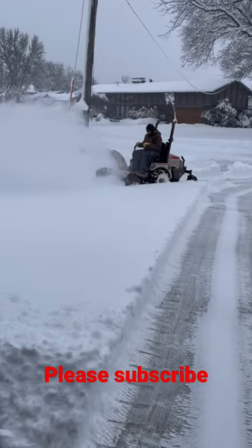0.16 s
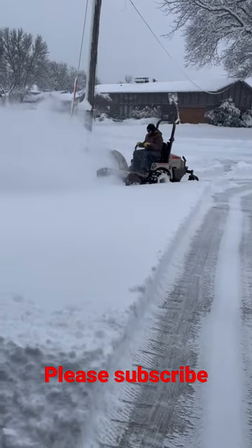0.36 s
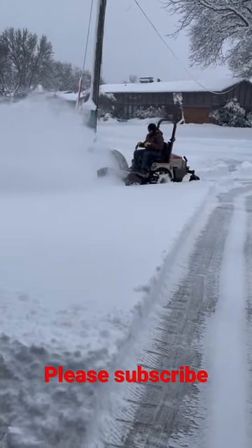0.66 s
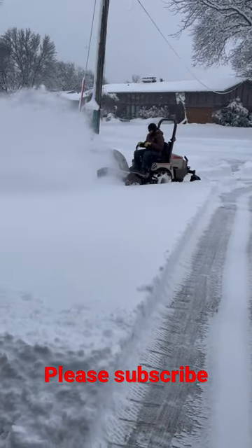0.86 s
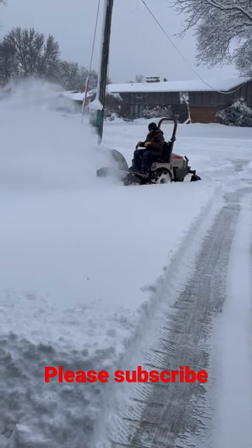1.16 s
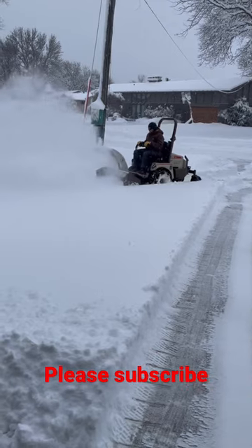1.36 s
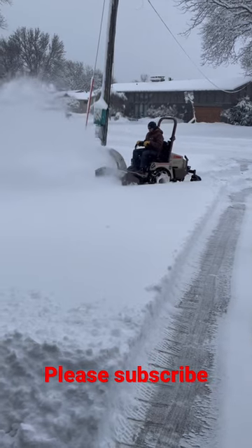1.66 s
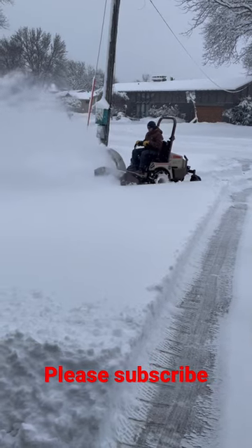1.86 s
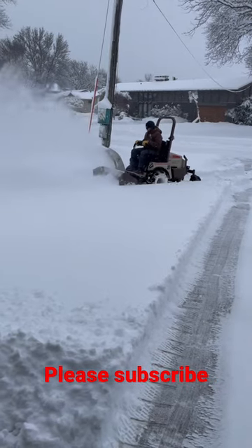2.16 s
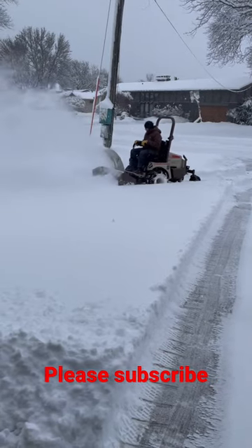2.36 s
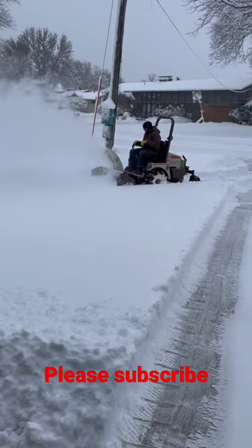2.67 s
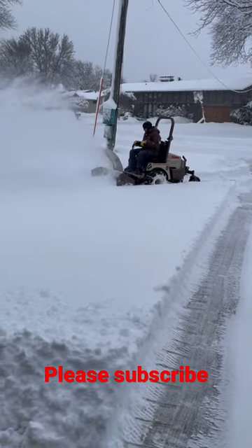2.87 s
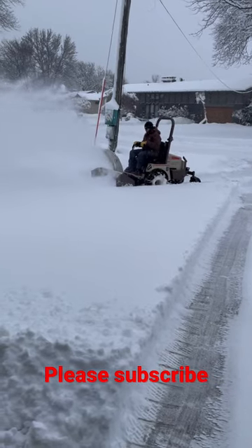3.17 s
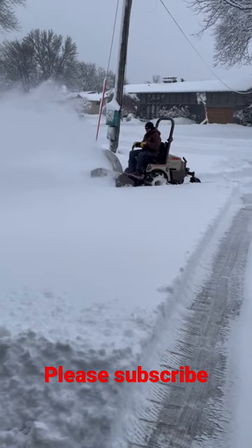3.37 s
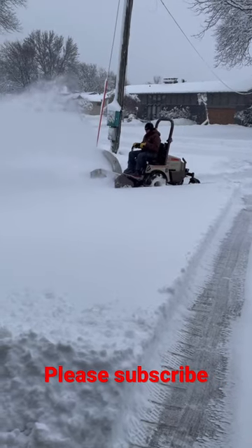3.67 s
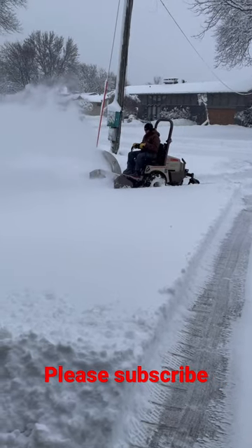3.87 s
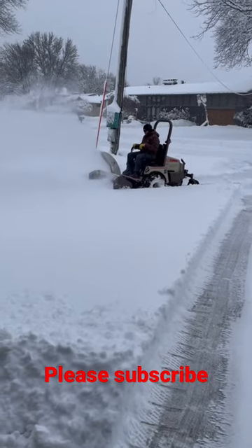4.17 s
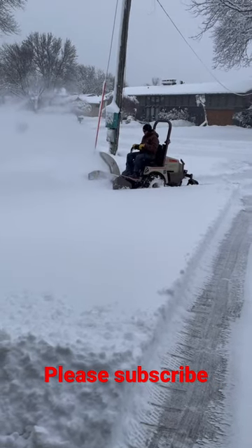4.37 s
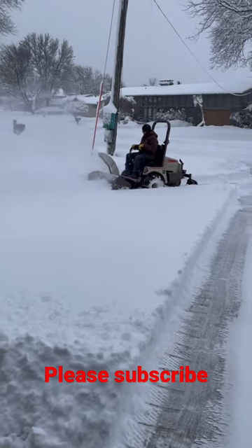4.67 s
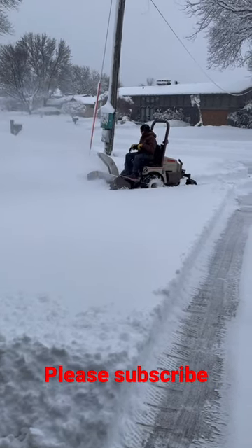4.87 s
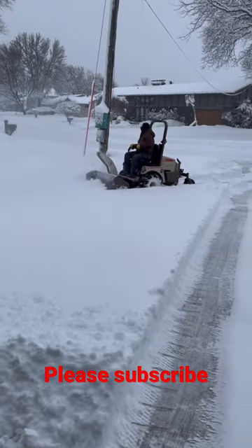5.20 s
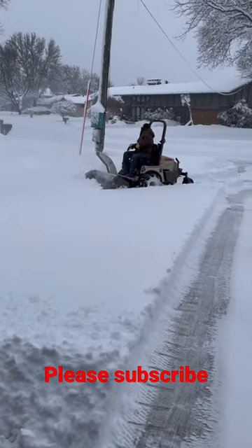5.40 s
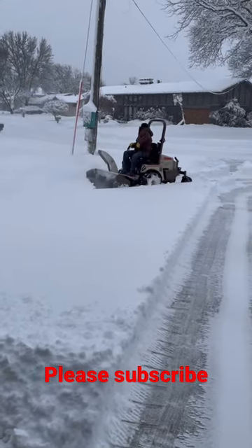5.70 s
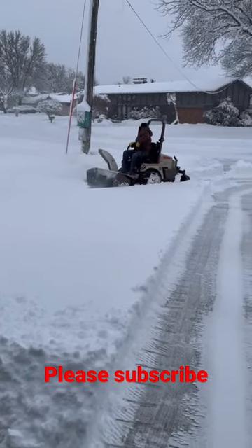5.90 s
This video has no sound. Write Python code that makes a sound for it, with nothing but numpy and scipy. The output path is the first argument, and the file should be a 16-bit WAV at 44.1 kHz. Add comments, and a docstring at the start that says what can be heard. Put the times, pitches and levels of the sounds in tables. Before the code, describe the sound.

A diesel mower pushes a snowblower through snow outdoors, heard from some way off. The engine hums and clatters steadily under a hydraulic whine, a throbbing gear drone and the hiss and faint squeal of thrown snow. Icy lumps clink on the auger at first. Midway the blower throbs harder in deep snow, then the whine fades and the engine runs slightly freer. The whine starts to return at the very end.

```python
"""A three-cylinder diesel mower pushes a snowblower along a driveway, some way off.
At first icy lumps clink on the auger, while exhaust, fan, gears and hydraulic pump hum and whine
over the diesel's clatter and the hiss and squeal of snow. Near 3 s a deep drift fills the impeller,
whose blade note beats against the exhaust. By about 4 s the load drops, the whine dies away and the
engine picks up. At the very end the wheels begin to push again."""
import sys
import numpy as np
from scipy import signal
from scipy.fft import rfft, irfft
from scipy.io import wavfile
from scipy.ndimage import uniform_filter1d

SR = 44100
rng = np.random.default_rng(int(sys.argv[2]) if len(sys.argv) > 2 else 0)


def transcribe(signal):
    """Save signal, clipped to [-1, 1], as a 16-bit WAV file at the path in sys.argv[1]."""
    frames = np.atleast_2d(signal).T
    limited = np.clip(frames, -1, 1)
    pcm = np.round(limited * 32767).astype(np.int16)
    wavfile.write(sys.argv[1], SR, pcm)


N = 266364
TIME = np.arange(N) / SR
FREQ = np.maximum(np.arange(N // 2 + 1) * SR / N, 1)

# engine speed: (time [s], firing rate [Hz])
FIRING_RATE = [(0, 87.46), (1.8, 87.57), (2.6, 87.74), (2.95, 88), (3.65, 87.91), (4.15, 88.98),
               (5.1, 89.07), (6.03, 88.63)]
# second harmonic of the exhaust: (time [s], level [dB])
EXHAUST_OCTAVE = [(0, -32), (1.3, -33), (2.5, -35.5), (3.2, -38), (4.2, -41), (5.15, -40.5), (5.7, -34.5),
                  (6.03, -32)]
# partials of engine, gear train, fan and blower gearbox:
# (order [per four-stroke cycle], loaded level [dB], free level [dB])
ENGINE_ORDERS = [(2, -56, -45), (4, -44, -46), (5, -47.5, -44.5), (7, -46, -53), (9, -46, -51),
                 (11, -58, -69), (13, -50, -66), (14, -55, -57), (15, -42, -46), (16, -49.5, -39),
                 (17, -47, -73), (18, -38, -46), (20, -42, -45), (21, -43, -45), (22, -41.5, -41.5),
                 (23, -46, -51), (24, -50.5, -55), (25, -47, -52), (28, -47, -49), (30, -57, -51),
                 (32, -47, -45.5), (33, -54, -51), (41, -49.5, -56)]
TIMING_ORDERS = [(69.76, -49.5, -52.5), (83.7, -46.5, -54), (86, -48, -52), (86.1, -50, -59),
                 (90.5, -51, -72)]
# (order [per fan or impeller turn], loaded level [dB], free level [dB])
FAN_ORDERS = [(2, -55, -47), (3, -45, -44.5), (4, -54, -56), (5, -40.5, -33), (7, -39.5, -40.5),
              (8, -57, -47.5), (9, -48, -52), (10, -43.5, -45), (11, -45.5, -56), (16, -44.5, -48.5)]
GEARBOX_ORDERS = [(7, -45, -54), (11, -47, -67), (12, -48.5, -62), (15, -51.5, -64), (18, -44.5, -70),
                  (19, -46.5, -71), (20, -42.5, -62), (21, -42.5, -67), (22, -39.5, -70), (23, -45, -47),
                  (25, -42, -54), (26, -44, -61), (27, -43, -60), (60, -46.5, -56)]
# partials of the four-bladed impeller: (order [per turn], relative level [dB])
BLADE_ORDERS = [(2, -29), (4, 1.5), (6, -8.5), (8, -9), (10, -12), (12, -21.5), (16, -19)]
# noise spectra: (frequency [Hz], relative density [dB])
RUMBLE_SPECTRUM = [(20, -27), (38, -15), (55, -1.5), (80, -2.5), (115, -4.5), (165, -13.5), (260, -15.5),
                   (400, -33)]
ROAR_SPECTRUM = [(150, -21), (290, -12), (380, -4), (480, 0.5), (700, 0), (900, 0), (1150, -2),
                 (1450, -4.5), (1750, -6), (2300, -26)]
CLATTER_SPECTRUM = [(1300, -18), (1900, -2), (2150, 0), (2550, -0.5), (2900, -1.5), (3100, -5), (3350, -3),
                    (3600, -13.5), (4000, -14), (4750, -12), (5100, -11), (5500, -12), (6200, -15),
                    (6700, -33)]
HISS_SPECTRUM = [(3000, -14), (3800, -1), (4400, 4.5), (4750, -3.5), (5150, 1), (5900, 3.5), (6200, 1),
                 (6600, 3), (7000, -69), (9000, -0.5), (10500, -5), (12000, -13.5), (12900, -21.5)]
# resonances of the steel parts: (frequency [Hz], bandwidth [Hz], relative level [dB])
CHUTE_MODES = [(4230, 74, -8), (4570, 69, 7.5), (5430, 26, 0), (5860, 85, 8)]
AUGER_MODES = [(3400, 26, -1), (3900, 49, -5.5), (4310, 69, 1), (4975, 41, -0.5), (5470, 44, -2),
               (5700, 80, -12), (6120, 100, -4.5)]
HOUSING_MODES = [(2450, 22, 3), (2508, 35, -1), (2636, 36, 3), (2834, 63, -1)]
COVER_MODES = [(1782, 22, -8), (1934, 27, 0), (2480, 33, 2.5), (2575, 41, -4), (2645, 67, 2),
               (2890, 88, -3), (3310, 42, -5)]
# icy lumps hit the auger: (time [s], peak level [dB], favoured frequency [Hz])
LUMP_HITS = [(0.0262, -23.5, 4300), (0.152, -25, 4970), (0.263, -29, 5700), (0.285, -29, 4970),
             (0.314, -27, 4440), (0.36, -35, 5680), (0.4055, -30, 5570), (0.445, -28, 5900),
             (0.4918, -26, 4930), (0.5177, -24, 4970), (0.562, -26, 4330), (0.6165, -34, 6100),
             (0.6464, -26, 4950), (0.701, -23.5, 5200), (0.7337, -24, 5020), (0.931, -25.5, 4980)]
# grit hits the steel: (time [s], level [dB])
GRIT_HITS = [(1.573, -40), (4.958, -33)]
# packed snow rubs the chute: (start [s], stop [s], frequency [Hz], level [dB])
CLUMP_RUBS = [(0, .6, 5730, -46), (0, 1.75, 4230, -50), (.55, .9, 6050, -44.5), (.6, 1.3, 5430, -50),
              (1.05, 2.1, 5680, -48), (1.8, 2.7, 4380, -49.5), (2.05, 3.37, 5430, -46),
              (2.8, 3.03, 5430, -47), (2.9, 3.2, 4430, -47), (3.3, 3.95, 4580, -48)]
# brief rattles of the covers: (time [s], rise in level [dB])
COVER_RATTLES = [(.15, 9), (.5, 4), (.58, 1), (1.94, 4), (2.04, 2), (2.84, 1), (3.55, 4), (3.89, 6),
                 (4.55, 3), (4.97, 5.5), (5.82, 7), (6.02, 9)]
# the wheels push: (start [s], stop [s])
WHEEL_PUSHES = [(-.5, 3.63), (5.95, 6.5)]
# level difference of the two microphone ports: (frequency [Hz], left minus right [dB])
STEREO_BALANCE = [(60, 0), (200, -1.5), (350, -3), (620, 0), (830, 2.5), (1020, 9), (1200, 3.5), (1500, 4),
                  (1680, 5.5), (1850, 0), (2900, -1), (5300, 1), (7000, -0.5)]
# their phase difference: (frequency [Hz], left lead [rad])
STEREO_LEAD = [(400, 0), (780, 0.66), (1120, 0.1), (1720, -0.63), (3270, 1.07), (4500, 1.3), (5000, 0.5),
               (5500, 0.84), (6200, 0.95), (6950, 3), (8500, 3.5), (10000, 5.5), (12200, 7.5), (13200, 24)]
# scattered sound at the ports: (frequency [Hz], level relative to direct sound [dB])
STEREO_SCATTER = [(100, -30.5), (500, -18.5), (1050, -7), (2200, -19.5), (3400, -5), (5500, -23),
                  (12000, -58)]

FAN_RATIO, IMPELLER_RATIO, PUMP_RATIO = 2.41, .6278, 29.105  # turns or piston strokes per engine cycle
FREE_HZ, DROOP_HZ = 89.04, 1.34  # firing rate running free; governor droop at full load
# base levels, running free and at full load
FIRING_DB, MESH_DB, HISS_DB = (-22.5, -27.5), (-51.5, -29.5), (-44.5, -40.5)
RUMBLE_DB, ROAR_DB, CLATTER_DB = (-39, -33.5), (-29.5, -29), (-37, -36)


def undb(db):
    """Decibels to amplitude ratio."""
    return 10 ** (np.asarray(db) / 20)


def unit(x):
    """Normalisation to rms 1."""
    return x / np.std(x)


def over_time(points):
    """Linear interpolation in time."""
    return np.interp(TIME, *np.transpose(points))


def across(points):
    """Interpolation on a log-frequency axis."""
    hz, value = np.transpose(points)
    return np.interp(np.log(FREQ), np.log(hz), value)


def by_load(levels_db, load):
    """Interpolation between a free and a loaded level."""
    free, loaded = levels_db
    return free + load * (loaded - free)


def noise():
    """White Gaussian noise."""
    return rng.standard_normal(N)


def walk(rate_hz, count=2048):
    """Random modulation: smoothed values drawn rate_hz times a second; rms 1."""
    steps = np.interp(TIME * rate_hz, np.arange(count), rng.standard_normal(count))
    return unit(uniform_filter1d(steps, max(int(SR / rate_hz / 2), 1)))


def colour(x, points):
    """Spectral shaping, with a roll-off beyond the end points; rms 1."""
    inside = np.clip(np.minimum(FREQ / points[0][0], points[-1][0] / FREQ), 0, 1)
    return unit(irfft(rfft(x) * undb(across(points)) * inside ** 2, N))


def ring(x, modes):
    """Forced vibration: x drives a sum of damped resonances."""
    response = sum(undb(db) / (1 + 2j * (FREQ - hz) / width) for hz, width, db in modes)
    return irfft(rfft(x) * response, N)


def tone(turns, db, rough):
    """A sinusoid with random amplitude and phase modulation of depth rough."""
    angle = 2 * np.pi * (turns + rng.random()) + rough * walk(14)
    return np.sqrt(2) * undb(db) * (1 + rough * walk(14)) * np.sin(angle)


def partials(turns, orders, load, rough):
    """Harmonics of a rotation: orders are rounded to whole numbers, and load sets each level."""
    return sum(tone(np.round(order) * turns, by_load((free, loaded), load), rough)
               for order, loaded, free in orders)


def knocks(cycle, repeat, depth, count=1500):
    """Cyclostationary noise: it swells at each of three firings and partly repeats every cycle."""
    pattern = np.interp(cycle % 1 * count, np.arange(count), rng.standard_normal(count))
    since_firing = cycle * 3 % 1
    return (noise() + repeat * unit(pattern)) * (1 + depth * np.exp(-since_firing / 0.14))


def powder():
    """Flow noise: fine powder blows through the chute at any load."""
    spectrum = [(4200, 1.5), (5500, 1.5), (6500, -3), (7000, -33), (9000, 1.5), (12500, -9)]
    return colour(noise(), spectrum) * undb(-53.5 + walk(12))


def plume(hiss_db):
    """An extended source: the cloud of thrown snow hisses in antiphase at the two ports."""
    fizz = colour(noise(), [(1500, -4), (3200, -9), (4500, -40), (6200, 17), (9500, -0.5)])
    return np.array([[1], [-1]]) * fizz * undb(hiss_db - 2.5)


def grit(decay_s=.002):
    """Brief impacts have broad spectra: two bits of grit tick on the steel."""
    snap = sum(undb(db) * (TIME >= s) * np.exp(-np.abs(TIME - s) / decay_s) for s, db in GRIT_HITS)
    return colour(noise(), [(6000, 0), (13000, 0)]) * snap


def squeals(wander=.006, edge_s=0.1, flutter_db=2.3):
    """Friction excites narrow bands of noise: each clump rubs the chute at its own wavering pitch."""
    warped_time = np.cumsum(1 + wander * walk(25)) / SR
    out = 0
    for start, stop, hz, db in CLUMP_RUBS:
        hold = np.clip(.5 + np.minimum(TIME - start, stop - TIME) / edge_s, 0, 1)
        angle = 2 * np.pi * hz * warped_time
        out = out + undb(db) * hold * (walk(260) * np.cos(angle) + walk(260) * np.sin(angle))
    return out * undb(flutter_db * walk(35))


def housing(load):
    """Structure-borne sound: loaded gears make the blower's steel housing rasp unevenly."""
    shake = colour(noise(), [(2300, 0), (3000, 0)]) * undb(2 * walk(24.6))
    return unit(ring(shake, HOUSING_MODES)) * load * undb(-44.5)


def covers(cycle, rattle_db):
    """Panel resonance: the knocks ring the sheet-metal covers, harder in short rattles."""
    shake = colour(knocks(cycle, repeat=0.37, depth=0.5), [(1600, 0), (3400, 0)]) * undb(1.4 * walk(18))
    return unit(ring(shake, COVER_MODES)) * undb(-43.5 + rattle_db)


def clink(peak_db, hz, contact_s=0.007, focus_db_per_khz=4.5, size=4096):
    """Modal impact: a lump grinds briefly on the auger; where it hits favours the modes near hz."""
    age = TIME[:size]
    steel = 0
    for mode_hz, width, db in AUGER_MODES:
        gain = undb(db - focus_db_per_khz * abs(mode_hz - hz) / 1000)
        steel = steel + gain * np.exp(-np.pi * width * age) * np.sin(2 * np.pi * mode_hz * age)
    contact = rng.standard_normal(size) * np.exp(-age / contact_s)
    hit = signal.fftconvolve(contact, steel)[:size]
    return hit / np.max(np.abs(hit)) * undb(peak_db)


def auger(ice_end_s=1.2, fade_s=0.26):
    """Impact excitation: lumps clink one by one; crumbs keep the steel ringing until the ice ends."""
    crumbs = undb(-46.5 + 4.4 * walk(90.5)) * np.clip((ice_end_s - TIME) / fade_s, 0, 1)
    grind = colour(noise(), [(3200, 0), (6300, 0.0046)])
    out = ring(grind * crumbs, AUGER_MODES) / np.std(ring(grind, AUGER_MODES))
    for s, db, hz in LUMP_HITS:
        hit, start = clink(db, hz), int(s * SR)
        out[start:start + len(hit)] += hit
    return out


def snow(turns, scrape_share):
    """Incoherent sources add in power: grains hiss while clumps scrape the chute and ring it."""
    spray = colour(noise() * undb(1.7 * walk(500)), HISS_SPECTRUM) * undb(.5 * walk(25))
    clumps = undb(2.6 * walk(45)) * (1 + 0.14 * np.cos(2 * np.pi * turns))
    scrape = unit(ring(noise() * clumps, CHUTE_MODES))
    return (spray + scrape_share * scrape) / np.sqrt(1 + scrape_share ** 2)


def rumble(load):
    """Low-frequency noise that grows with load."""
    return colour(noise(), RUMBLE_SPECTRUM) * undb(by_load(RUMBLE_DB, load))


def clatter(cycle, load, octave_db, rattle_db):
    """Combustion noise: the treble of the knocks follows the exhaust's octave and the rattles."""
    level_db = by_load(CLATTER_DB, load) + 0.22 * (octave_db - np.mean(octave_db)) + .3 * rattle_db
    knocking = colour(knocks(cycle, repeat=0.34, depth=0.35), CLATTER_SPECTRUM)
    return knocking * undb(level_db + 0.98 * walk(30))


def roar(cycle, turns, load):
    """Amplitude modulation: under load each blade and each impeller turn chop the midrange roar."""
    steady = colour(knocks(cycle, repeat=.45 - 0.21 * load, depth=0.31), ROAR_SPECTRUM)
    chop = 0.2 * np.cos(8 * np.pi * turns) + 0.19 * np.cos(2 * np.pi * turns)
    return steady * undb(by_load(ROAR_DB, load)) * (1 + load * chop)


def pump(cycle, fill, attack_s=0.21, release_s=0.39, coast_db=-22, fade_db_per_s=0.7):
    """Pressure ripple: hydraulic pistons whine as the wheels push and fall quiet as they coast."""
    push = sum(np.clip(np.minimum((TIME - start) / attack_s, 1 - (TIME - stop) / release_s), 0, 1)
               for start, stop in WHEEL_PUSHES)
    pressure_db = 20 * np.log10(np.maximum(push, undb(coast_db)))
    whine_db = -31.6 + pressure_db - fade_db_per_s * TIME + 0.86 * walk(5.2)  # the mower moves off
    octave_db = -38.5 + pressure_db + 0.5 * fill  # deep snow brightens the whine
    pistons = PUMP_RATIO * cycle
    return tone(pistons, whine_db, rough=.04) + tone(2 * pistons, octave_db, rough=0.046)


def snow_fill(load, drift_s=3.07, half_width_s=0.76):
    """Impeller loading (1 = well filled): an even layer of snow and one passing drift."""
    drift = np.exp(-((TIME - drift_s) / half_width_s) ** 2)
    return 0.17 + load * (0.35 + drift)


def impeller(turns, fill):
    """Blade-passing tones: four blades slap the snow, with amplitude proportional to the fill."""
    blade_db = -30.5 + 20 * np.log10(fill)
    return sum(tone(order * turns, blade_db + db, rough=0.09) for order, db in BLADE_ORDERS)


def gearbox(turns, load, fill, bite_s=0.85, throb=.8):
    """Gear meshing: the drone builds as the auger bites in; its third harmonic whistles in deep snow."""
    mesh_db = by_load(MESH_DB, load) - 8.5 * np.exp(-TIME / bite_s) + 0.2 * fill
    angle, teeth = 2 * np.pi * turns, 30 * turns
    # an off-centre gear bites harder and runs faster once a turn
    mesh = tone(teeth + 0.068 * np.sin(angle), mesh_db, rough=0.067) * (1 + throb * np.cos(angle))
    bite = ((1 + np.cos(angle)) / 2) ** 2
    growl = unit(ring(noise(), [(555, 67, 0)])) * bite * undb(mesh_db - 10)
    whistle = tone(3 * teeth, -42.5, rough=0.15) * fill
    return mesh + growl + whistle + partials(turns, GEARBOX_ORDERS, load, rough=0.09)


def engine(cycle, load, fill, octave_db):
    """Periodic sources: three exhaust pulses a cycle, uneven cylinders, gear train and cooling fan."""
    firing = 3 * cycle
    firing_db = by_load(FIRING_DB, load) + 0.9 * fill  # it fires harder in deep snow
    exhaust = tone(firing, firing_db, rough=0.025) + tone(2 * firing, octave_db, rough=0.091)
    cylinders = partials(cycle, ENGINE_ORDERS, load, rough=0.21)
    gear_train = partials(cycle, TIMING_ORDERS, load, rough=0.58)
    fan = partials(FAN_RATIO * cycle, FAN_ORDERS, load, rough=0.13)
    return exhaust + cylinders + gear_train + fan


def ports(x, scatter_s=0.044, edge_s=.004):
    """Level and phase differences between two ports, plus scattering from ground and houses."""
    tail = noise() * np.exp(-TIME / scatter_s)
    scatter = rfft(tail) / np.sqrt(np.sum(tail ** 2)) * undb(across(STEREO_SCATTER))
    sides = np.array([[1], [-1]])
    gain = undb(sides * across(STEREO_BALANCE) / 2)
    lead = np.exp(.5j * sides * across(STEREO_LEAD))
    edges = np.clip(np.minimum(TIME, TIME[-1] - TIME) / edge_s, 0, 1)
    return irfft(rfft(x * edges) * (1 + sides * scatter) * lead * gain / np.mean(gain, axis=0), N)


def scene():
    """Superposition: all shafts are geared to the crank, whose droop in speed gives the load."""
    firing_hz, octave_db = over_time(FIRING_RATE), over_time(EXHAUST_OCTAVE)
    load = np.clip((FREE_HZ - firing_hz) / DROOP_HZ, 0, 1)
    fill = snow_fill(load)
    cycle = np.cumsum(firing_hz * (1 + .0005 * walk(12))) / SR / 3  # four-stroke cycles elapsed
    turns = IMPELLER_RATIO * (cycle - np.interp(.036, TIME, cycle))  # first throb at 0.036 s
    rattle_db = sum(db * np.exp(-((TIME - s) / 0.03) ** 2) for s, db in COVER_RATTLES)
    hiss_db = by_load(HISS_DB, load)
    mix = engine(cycle, load, fill, octave_db) + impeller(turns, fill)
    mix += gearbox(turns, load, fill) + pump(cycle, fill)
    mix += rumble(load) + roar(cycle, turns, load) + clatter(cycle, load, octave_db, rattle_db)
    mix += snow(turns, scrape_share=0.29 * fill) * undb(hiss_db)
    mix += powder() + grit() + auger() + squeals() + housing(load) + covers(cycle, rattle_db)
    return ports(mix) + plume(hiss_db)


def record(dry, top_hz=12900):
    """Band limiting: a steep low-pass filter removes the highest treble."""
    return signal.sosfilt(signal.ellip(8, .2, 70, top_hz, fs=SR, output="sos"), dry)


dry = scene()
out = record(dry)
transcribe(out)
```